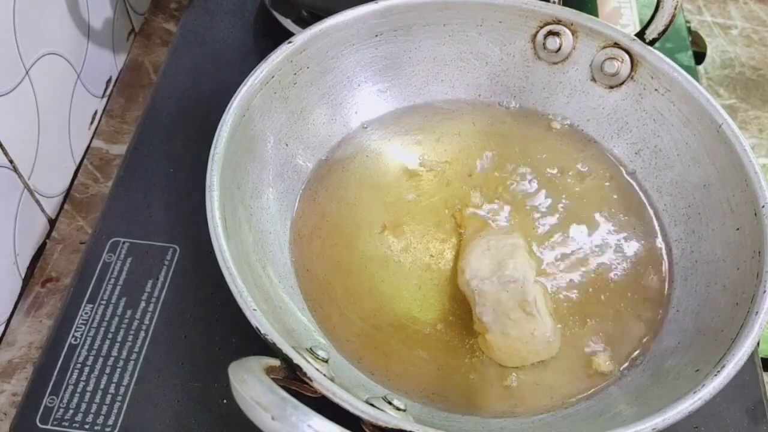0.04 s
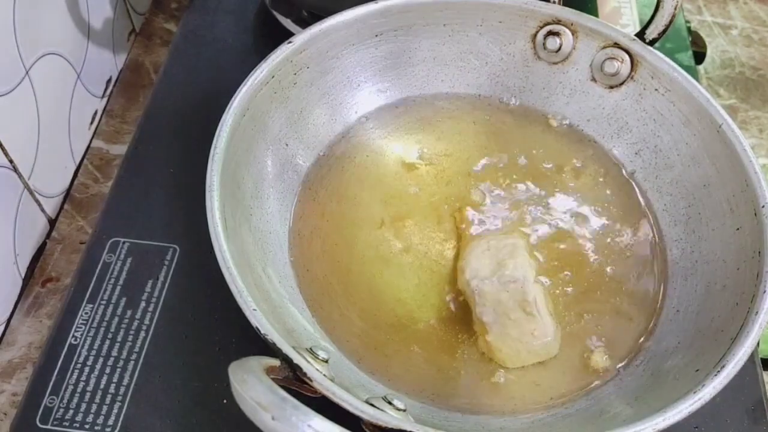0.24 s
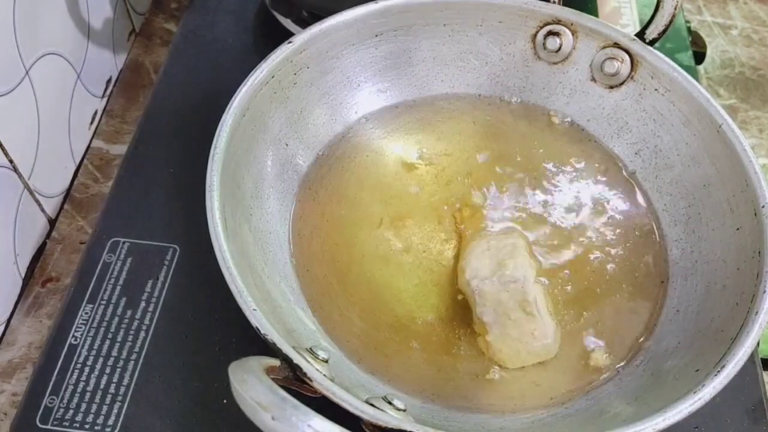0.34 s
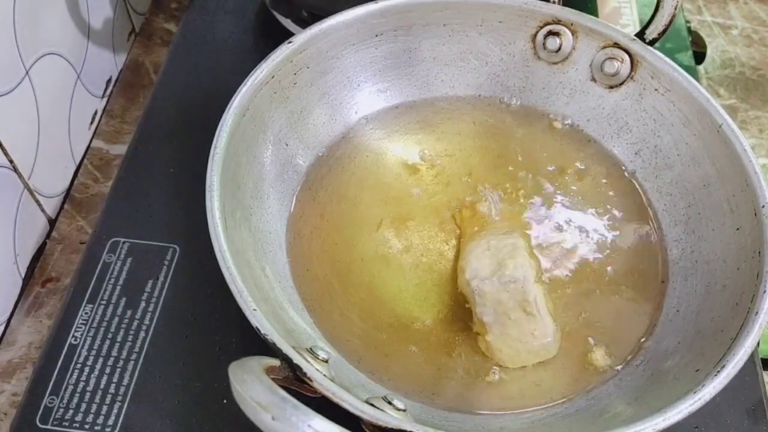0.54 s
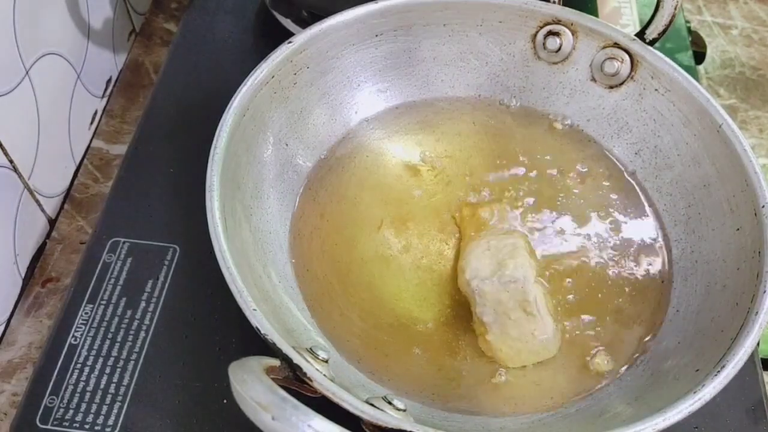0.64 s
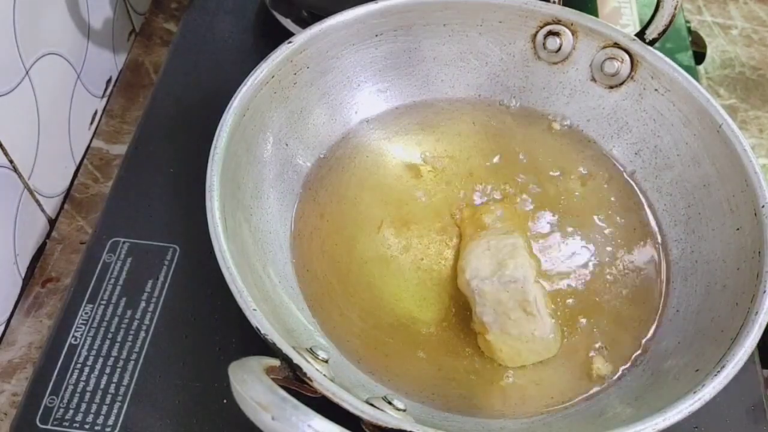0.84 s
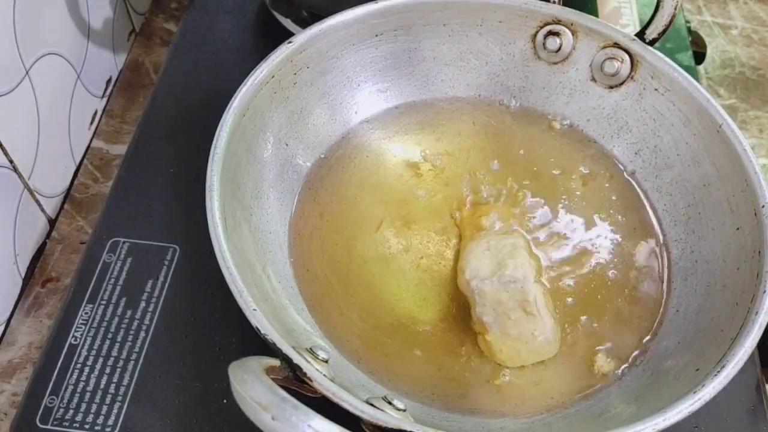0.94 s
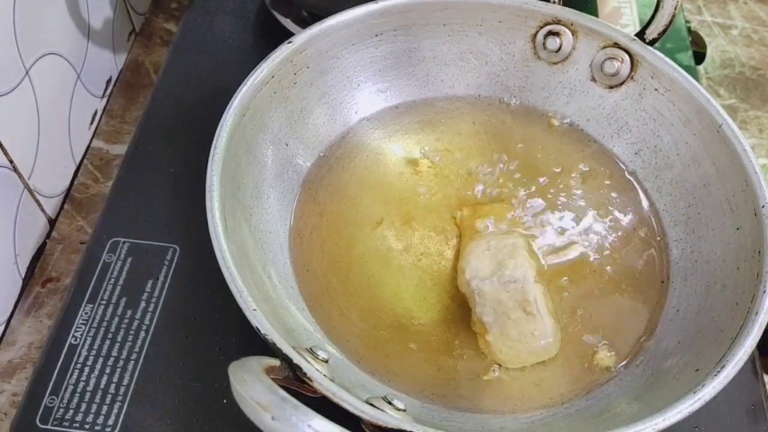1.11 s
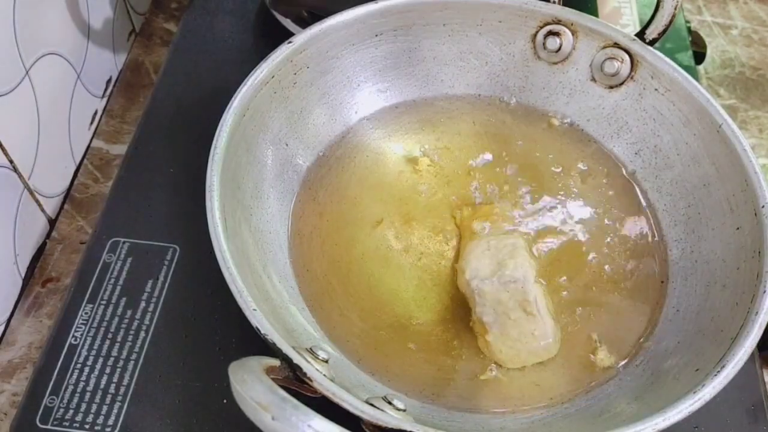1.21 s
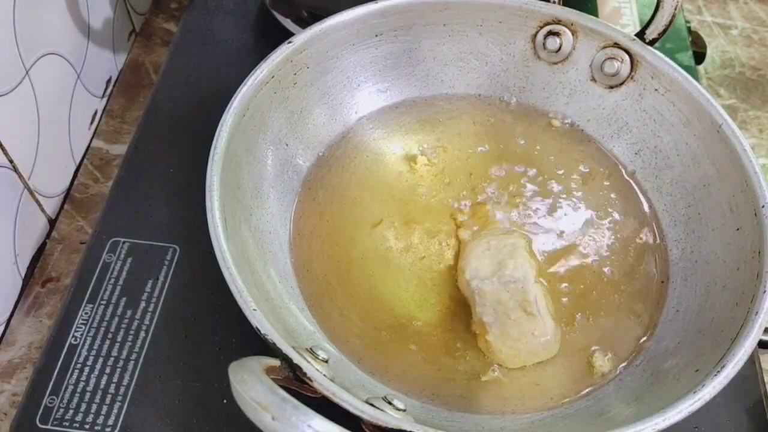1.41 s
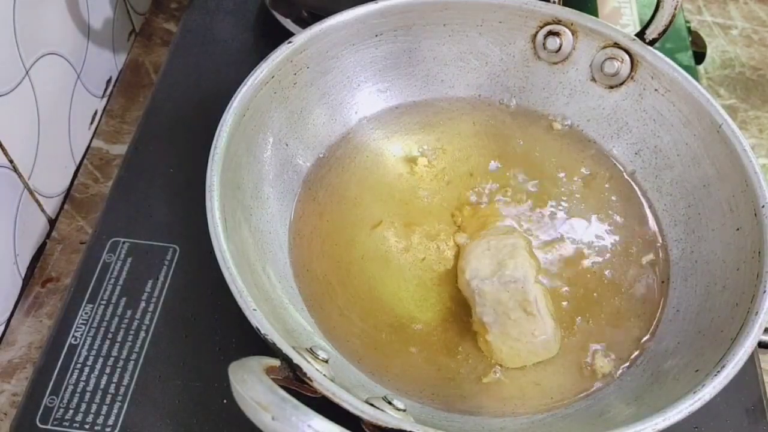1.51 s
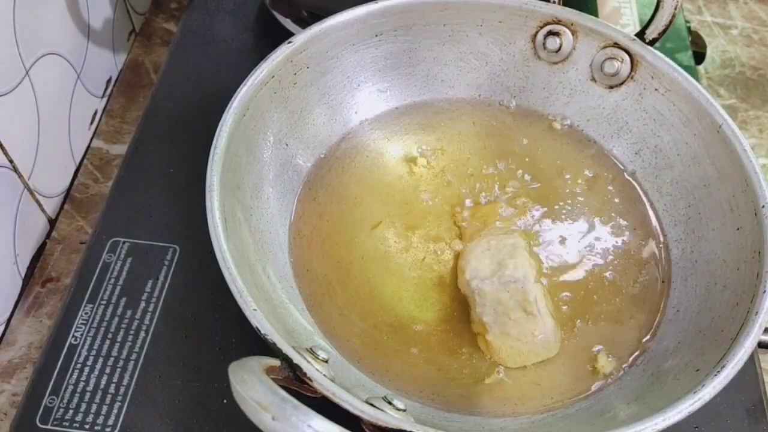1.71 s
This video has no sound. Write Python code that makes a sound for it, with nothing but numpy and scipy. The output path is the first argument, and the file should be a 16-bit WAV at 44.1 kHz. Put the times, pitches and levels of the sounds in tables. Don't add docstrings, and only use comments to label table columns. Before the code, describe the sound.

Food frying quietly in oil in a metal pan, with single crisp pops over faint fizz, an early hollow thud that booms, then a thin pulsing steam squeak; close stereo microphone in a small hard-walled kitchen.

```python
import sys
import numpy as np
from scipy import signal
from scipy.io import wavfile

SR = 44100
rng = np.random.default_rng(int(sys.argv[2]) if len(sys.argv) > 2 else 0)


def unload_audio(sound):
    columns = np.transpose(np.atleast_2d(sound))
    steps = np.round(np.clip(columns, -1, 1) * 32767)
    wavfile.write(sys.argv[1], SR, steps.astype(np.int16))


def volts_from_db(level):
    exponent = np.asarray(level, float) / 20
    return 10 ** exponent


N = 77175
PAD = 4410
TIME_S = (np.arange(N + PAD) - PAD) / SR


def rms_one(x):
    return x / np.sqrt(np.mean(x ** 2) + 1e-20)


def at_hz(points, hz):
    pitches, values = np.transpose(points)
    return np.interp(np.log(hz), np.log(pitches), values)


def drift(rate_hz, count):
    r = np.exp(-80 * np.pi * rate_hz / SR)
    noise = rng.standard_normal(count // 40 + 2002)
    slow = signal.lfilter([1], [1, -2 * r, r * r], noise)[2000:]
    return np.interp(np.arange(count) / 40, np.arange(len(slow)), rms_one(slow))


def ring(clicks, hz, t60_s):
    r, w = volts_from_db(-60 / (t60_s * SR)), 2 * np.pi * hz / SR
    return signal.lfilter([0, np.sin(w)], [1, -2 * r * np.cos(w), r * r], clicks + 1e-18)


def bands():
    edges = 22 * 2 ** np.arange(0, 9.6, .5)
    white = rng.standard_normal((2, 2, N + PAD))
    for k, (low, high) in enumerate(zip(edges, edges[1:])):
        band = signal.butter(2, [low, high], "band", fs=SR, output="sos")
        yield np.sqrt(low * high), signal.sosfilt(band, white[k % 2])


def mix(pair, alike):
    alike = np.clip(alike, 0, 1)
    shared = np.sqrt(1 + alike) * pair[0]
    opposed = np.sqrt(1 - alike) * pair[1] * [[1], [-1]]
    return shared + opposed


def bursts(rows, glide):
    out = np.zeros((2, N + PAD))
    port_lag_s = .000025
    for s, db, hz, cycles, pan_db in rows:
        start = int(s * SR) + PAD - 50
        span = slice(start, start + 4000)
        for channel, side in enumerate((1, -1)):
            turns = np.maximum(TIME_S[span] - s - side * port_lag_s / 2, 0) * hz
            life = 2 * turns / cycles
            swell = (life * np.exp(1 - life)) ** 2
            rise = glide * np.minimum(life, 4) * turns / 4
            wave = np.cos(2 * np.pi * (turns - cycles / 2 + rise))
            level_db = db + side * np.clip(pan_db, -6, 6) / 2
            out[channel, span] += volts_from_db(level_db) * swell * wave
    return out


# (pitch [Hz], level [dB per Hz])
HUM_COLOUR = [(25, -8.5), (90, 3), (170, -12), (300, -28.5), (700, -28.5), (1200, -30), (7000, -31.5),
              (15000, -33)]
# (pitch [Hz], likeness [0 to 1])
HUM_LIKENESS = [(60, 0.97), (150, 1), (300, 0.29), (1000, 1), (4000, .1), (12000, 0.026)]


def room_hum():
    hum = 0
    for hz, pair in bands():
        patchiness_db = 3.0 if hz < 1500 else 1.5
        level_db = at_hz(HUM_COLOUR, hz) + patchiness_db * drift(9.0, N + PAD)
        hum = hum + volts_from_db(level_db) * mix(pair, at_hz(HUM_LIKENESS, hz))
    return volts_from_db(-60) * rms_one(hum)


# (time [s], level [dB])
FIZZ_VIGOUR = [
    (0.0, -59),
    (0.214, -53.5),
    (0.302, -56.5),
    (0.442, -61.5),
    (0.784, -49),
    (0.964, -66.5),
    (1.35, -64),
    (1.75, -68),
]


def fizz():
    shape, per_s = (2, N + PAD), 1200
    s, db = np.transpose(FIZZ_VIGOUR)
    vigour_db = np.interp(TIME_S, s, db)
    sizes = volts_from_db(2.02 * np.minimum(rng.exponential(1, shape), 4)) * rng.choice([-1, 1], shape)
    clicks = sizes * (rng.random(shape) < per_s / SR)
    dealt = rng.integers(0, 12, shape)
    crackle = 0
    for k, hz in enumerate(np.geomspace(1200, 7500, 12)):
        crackle = crackle + ring(clicks * (dealt == k), hz, 3.35 / hz) * volts_from_db(-2.0 * k / 4)
    return volts_from_db(vigour_db - 2.5) * rms_one(crackle)


# (time [s], peak level [dB], pitch [Hz],
# length [cycles], pan [dB]); here a burst just before the start, only its echo in the room is left
EARLIER_BURST = [
    (-.03, -12, 5440, 1, 2.5),
    (-.03, -18.5, 2980, 1.37, 0.5),
]
# (time [s], peak level [dB],
# pitch [Hz], length [cycles], pan [dB])
POPS = [
    (.1188, -38, 2630, 4, -5),
    (.1306, -37.5, 2620, 4.4, .5),
    (.2038, -38.5, 2560, 4, -.5),
    (.3026, -17.5, 2570, 3.73, 0),
    (.669, -47, 2580, 4.7, -6),
    (.7812, -29, 3180, 2.68, 2.5),
    (.7812, -33, 2162, 1.78, -2),
    (1.1575, -46.5, 2620, 3.65, 2),
    (1.6759, -28, 2740, 4.18, -2),
        (.305, -32, 4800, 3.5, -2.5), (0.691, -37, 4000, 2.3, -1.5), (0.7822, -26, 4700, 3.7, -2.5),
               (1.1246, -30, 3700, 1.73, -2), (1.126, -27.5, 5270, 3.15, -2), (1.3143, -37, 3630, 2, 1),
               (1.6757, -29, 4250, 3.11, -1.5), (1.523, -52.5, 2740, 2.2, -5),
        (.119, -33, 6700, 3.1, 0), (0.3033, -26.5, 7040, 2.65, 2), (0.3455, -34, 7100, 2.4, -3),
              (0.395, -22.5, 6980, 3.5, -.5), (0.691, -31, 6760, 3.44, 0), (0.7802, -31.5, 7550, 3.8, 6),
              (1.1268, -33.5, 7530, 3.5, 2), (1.3139, -25.5, 7020, 3.4, 0), (1.5227, -30, 7580, 3.2, 0),
              (1.6769, -25.5, 7700, 3.5, 1.5),
        (0.1185, -41, 4300, 1.5, -3), (.2042, -41, 990, 1.4, .5), (.3028, -46, 11000, 1.6, .5),
         (0.3448, -39, 10000, 2.5, 1.5), (.396, -47, 10000, 2.35, 2), (.7812, -52, 12000, 1.5, .5),
         (1.1256, -57, 11000, 1.8, .5), (1.3141, -35.5, 10500, 1.66, 0.5), (1.5232, -32, 10500, 2.46, 0.5),
         (1.6765, -40, 9570, 2.5, 2)]


def bubble_pops():
    return bursts(POPS + EARLIER_BURST, glide=0.022)


# (time [s], peak level [dB], pitch [Hz], length [cycles], pan [dB])
FAR_KNOCKS = [
    (.865, -35.5, 577, 1.11, 0),
    (.885, -32.5, 1350, 1.04, -1),
    (1.25, -43.5, 700, 1.12, 1),
    (1.398, -27.5, 484, 1.65, -1),
    (1.402, -33.5, 1030, 1.24, -.5),
    (.07, -54, 348, 2.1, .5),
    (.66, -40, 1080, 1.2, 22),
]


def far_knocks():
    return bursts(FAR_KNOCKS, glide=0)


# (time [s], peak level [dB], pitch [Hz], length [cycles], pan [dB])
THUDS = [
    (.2392, -6.5, 820, 1.26, 1.5),
    (.4174, -23, 595, 1.17, 4.5),
    (1.4045, -42, 419, 12.47, 0),
    (.2335, -33, 800, 2.4, 5.5),
]


def thuds():
    return bursts(THUDS, glide=0.016)


# (pitch [Hz], level [dB], time to fade by 60 dB [s])
ROOM_MODES = [(75.2, -40, 0.52), (87.8, -37.5, 1.3), (94.8, -33, 1.4), (112.5, -37.5, 1.25),
              (135, -41, 1.3), (156.5, -30.5, 0.86), (164.6, -33, 1.5), (221.7, -41, 2.29),
              (337.6, -29.5, 0.29), (456.5, -39.5, 0.49), (497, -36.5, 0.34), (638, -44.5, 0.35),
              (715, -36, .4)]
# (low modes [dB], upper modes [dB])
THUD_MODE_DB = [
    (-2.94, 4),
    (-15, -1),
    (-30.5, -18.5),
]


def room_modes():
    out = 0
    for hz, db, t60_s in ROOM_MODES:
        upper = hz > 270
        clicks = np.zeros(N + PAD)
        for (s, *_), (low_db, upper_db) in zip(THUDS, THUD_MODE_DB):
            clicks[int(s * SR) + PAD] = volts_from_db(upper_db if upper else low_db)
        rise_cycles = 2.5
        tone = ring(clicks, hz, t60_s) - ring(clicks, hz, 6.9 * rise_cycles / hz)
        wobble = volts_from_db(2.5 * drift(4 + hz / 30, N + PAD))
        left = tone * volts_from_db(1.5 * (hz > 130))
        right = np.roll(tone, int(.2 * SR / hz) if upper else 0)
        out = out + volts_from_db(db) * wobble * np.stack([left, right])
    return out


# (time [s], peak level [dB], length [s], pitch [Hz])
SQUEAKS = [
    (0.763, -59, .06, 6470),
    (0.818, -39.5, 0.027, 6880),
    (.857, -50, 0.091, 6900),
    (.9715, -54, 0.034, 7100),
]
SQUEAK_UPPER_DB = [-7, -15, -11, -5.5]
# (time [s], peak level [dB], pitch [Hz], length [cycles], pan [dB])
SQUEAK_ACCENTS = [
    (.8838, -38, 7040, 14.0, -3),
    (.9608, -39, 7140, 14.0, -4),
    (.9608, -54, 13700, 24.0, .5),
    (.8838, -53, 13700, 24.0, .5),
    (.825, -54, 10800, 6.0, .5),
]


def steam_squeaks():
    pulses_per_s, pulse_s, upper_hz = 175, .0014, 13730
    rows = []
    for (s, db, length_s, hz), upper_db in zip(SQUEAKS, SQUEAK_UPPER_DB):
        for k, (late, loud, pitch) in enumerate(rng.standard_normal((14, 3))):
            at = (k + .2 * late * (k > 0)) / pulses_per_s
            fade_db = 12 * (at / length_s) ** 4
            level_db = db + 2.13 * np.clip(loud, -2, 1) - fade_db
            main_hz, high_hz = hz * (1 + .015 * pitch), upper_hz * (1 + .006 * pitch)
            rows.append((s + at, level_db, main_hz, 2 * hz * pulse_s, -4.5))
            rows.append((s + at, level_db + upper_db, high_hz, 4 * hz * pulse_s, 0.5))
    return bursts(rows + SQUEAK_ACCENTS, glide=0)


# delay [s], and level of each [dB]
PAN_ECHO_S = [.0049, .0078]
PAN_ECHO_DB = [-11.5, -12]
# (pitch [Hz], time to fade by 60 dB [s])
ROOM_T60 = [(300, 0.5), (800, .55), (2500, .5), (5000, 0.34), (8000, 0.62), (13000, 0.35)]
# (pitch [Hz], level [dB])
ROOM_COLOUR = [(300, -16.5), (650, -16.5), (1200, -21), (2500, -15.5), (5000, -10.5), (8000, -17),
               (13000, -17.5)]


def kitchen(near, far):
    t = np.arange(N + PAD) / SR
    delay_s, build_s = 0.0068, 0.0013
    swell = 1 - np.exp(-np.maximum(t - delay_s, 0) / build_s)
    tail = 0
    for hz, pair in bands():
        if hz > 250:
            level_db = at_hz(ROOM_COLOUR, hz) - 60 * t / at_hz(ROOM_T60, hz)
            tail = tail + volts_from_db(level_db) * mix(pair, 0.11)
    tail = swell * tail
    drops = mix(rng.standard_normal((2, len(t))), .5) * (rng.random(len(t)) < .3)
    splash = signal.sosfilt(signal.butter(2, 1940, "high", fs=SR, output="sos"), drops)
    response = 0.11 * tail + volts_from_db(-16.5 - 60 * t / 0.051) * splash
    response[:, 0] += 1
    for s, db in zip(PAN_ECHO_S, PAN_ECHO_DB):
        response[:, int(s * SR)] += volts_from_db(db)
    near_heard = signal.fftconvolve(near, response, axes=1)
    far_heard = signal.fftconvolve(far, 0.15 * tail, axes=1)
    return (near_heard + far_heard)[:, :N + PAD]


def scene():
    squeak, wet = steam_squeaks(), 0.73
    pan = fizz() + bubble_pops() + thuds() + wet * squeak
    heard = kitchen(pan, far_knocks()) + (1 - wet) * squeak
    return (room_hum() + heard + room_modes())[:, PAD:]


def roll_off(x):
    return signal.sosfilt(signal.butter(12, 15430, fs=SR, output="sos"), x)


def record(dry):
    no_rumble = signal.sosfilt(signal.butter(2, 43.2, "high", fs=SR, output="sos"), dry)
    finished = signal.sosfilt(signal.cheby2(14, 50, 15600, fs=SR, output="sos"), no_rumble)
    return roll_off(finished)


dry = scene()
out = record(dry)
unload_audio(out)
```